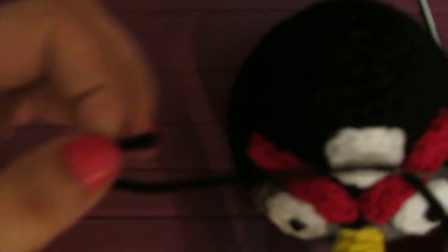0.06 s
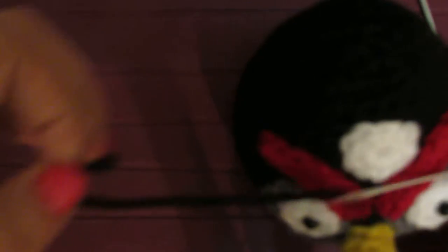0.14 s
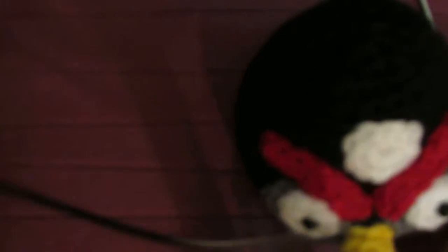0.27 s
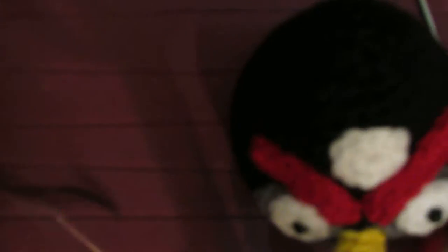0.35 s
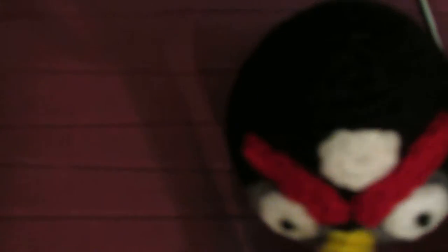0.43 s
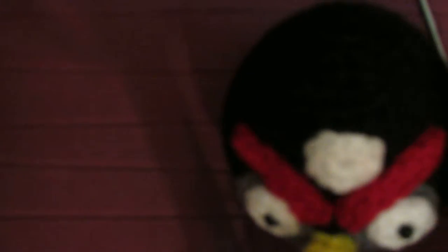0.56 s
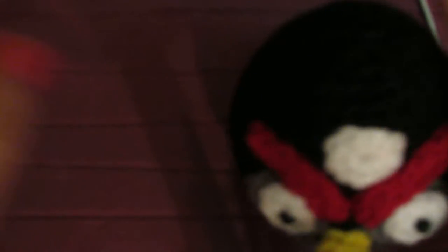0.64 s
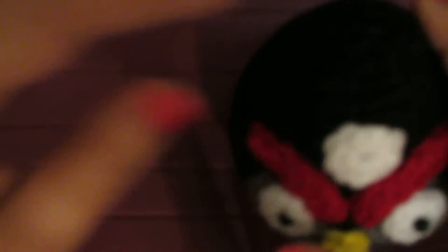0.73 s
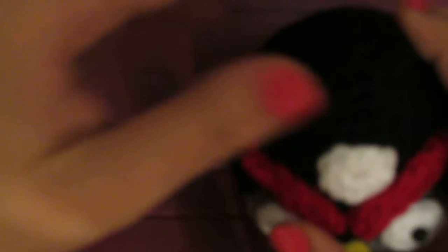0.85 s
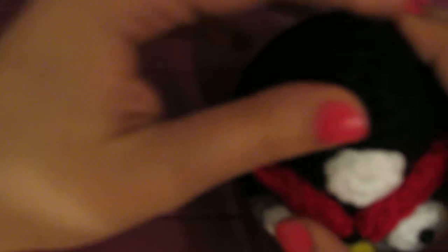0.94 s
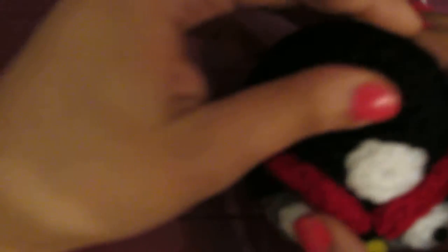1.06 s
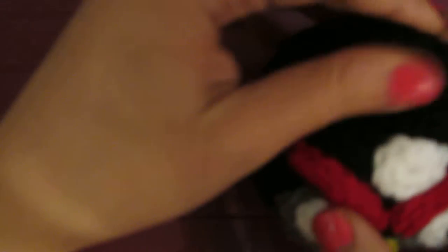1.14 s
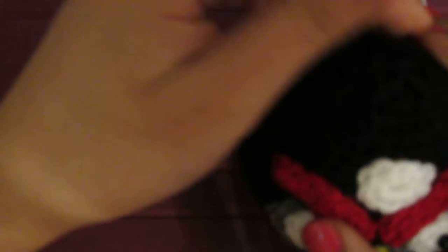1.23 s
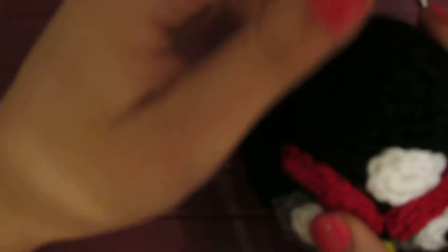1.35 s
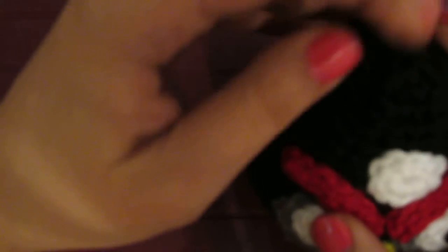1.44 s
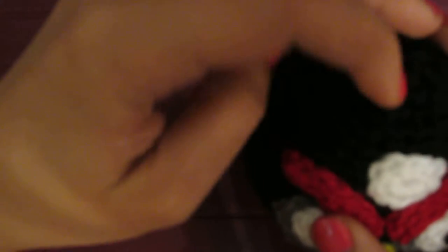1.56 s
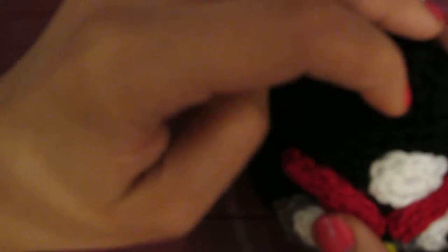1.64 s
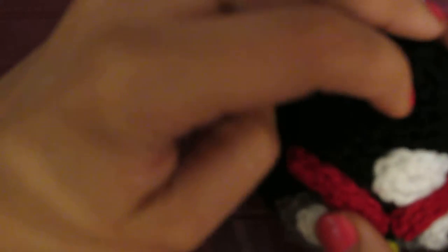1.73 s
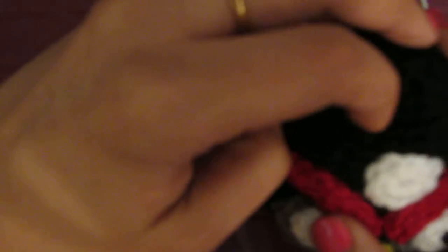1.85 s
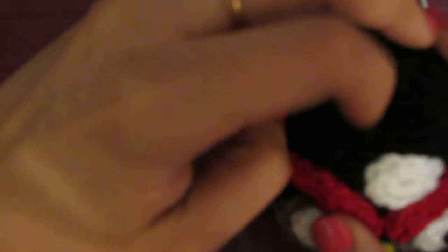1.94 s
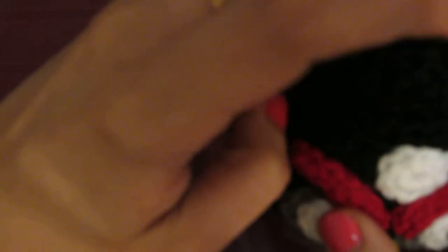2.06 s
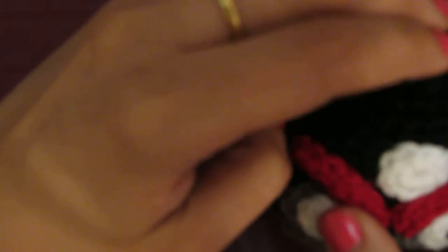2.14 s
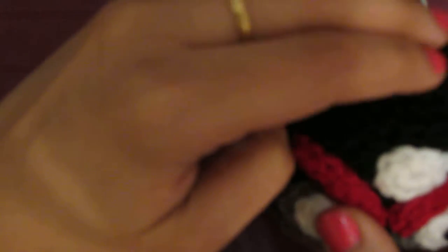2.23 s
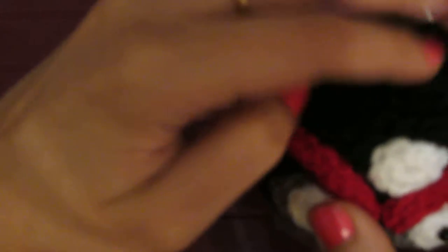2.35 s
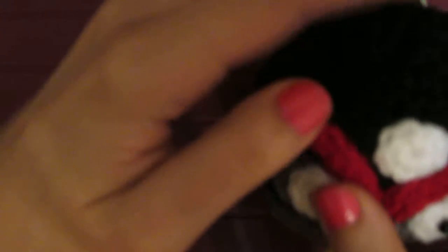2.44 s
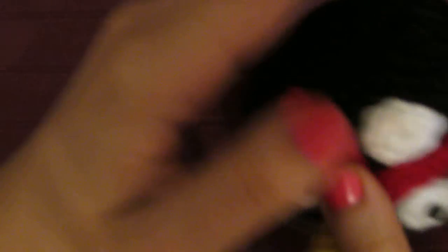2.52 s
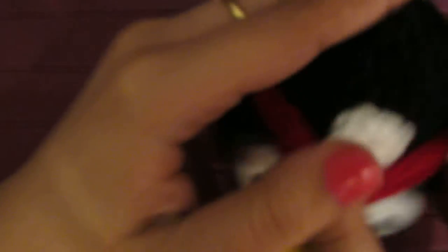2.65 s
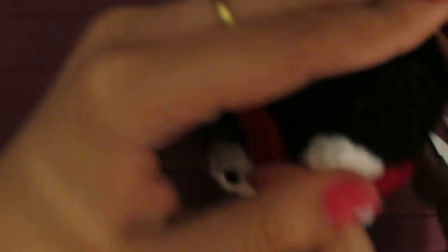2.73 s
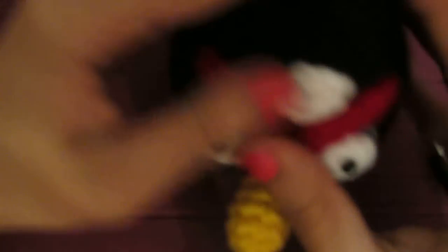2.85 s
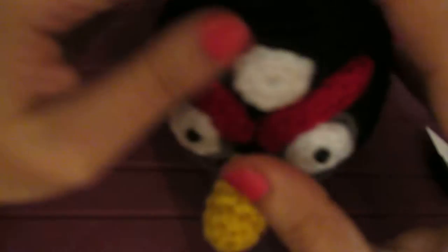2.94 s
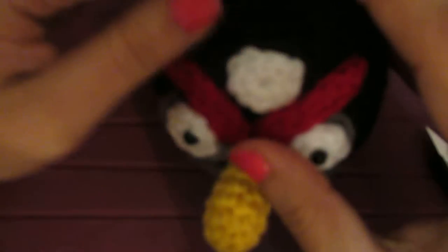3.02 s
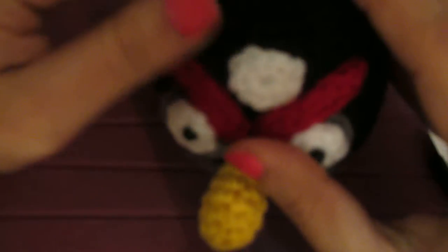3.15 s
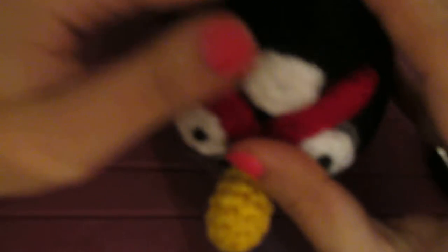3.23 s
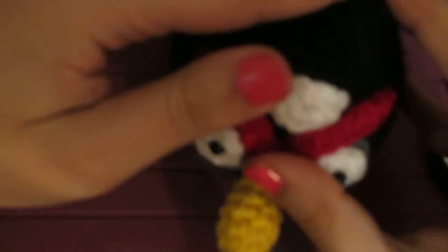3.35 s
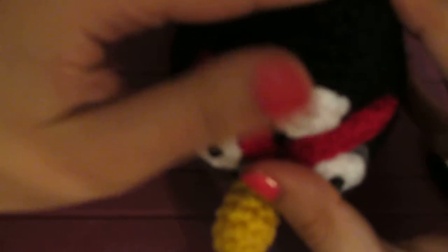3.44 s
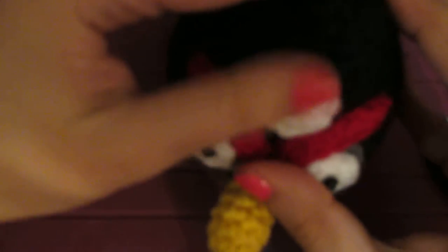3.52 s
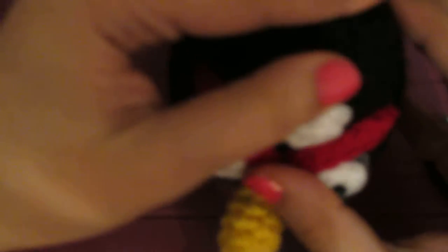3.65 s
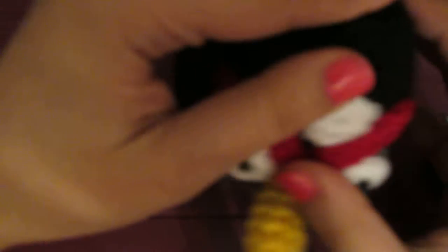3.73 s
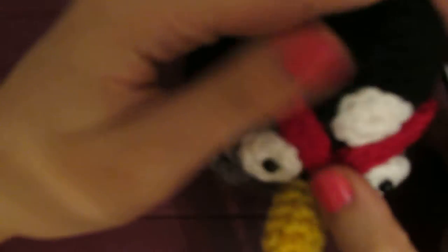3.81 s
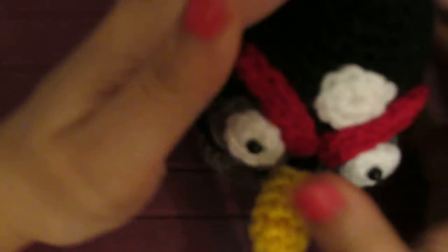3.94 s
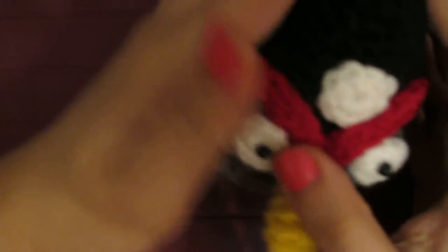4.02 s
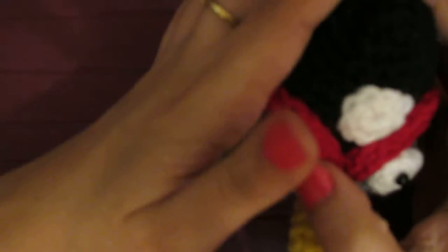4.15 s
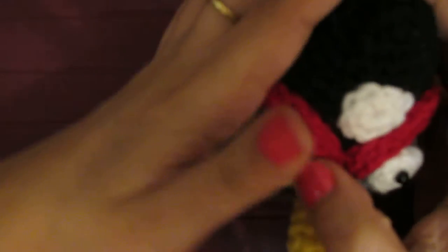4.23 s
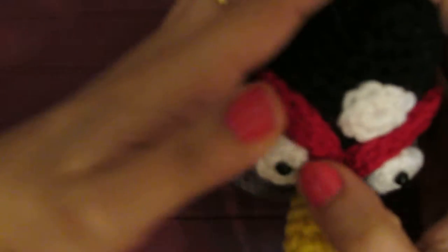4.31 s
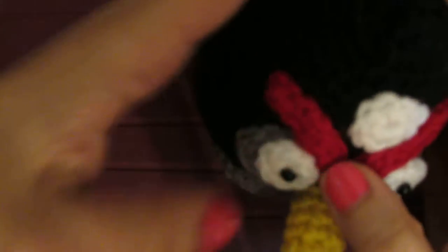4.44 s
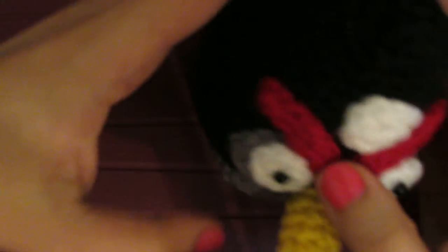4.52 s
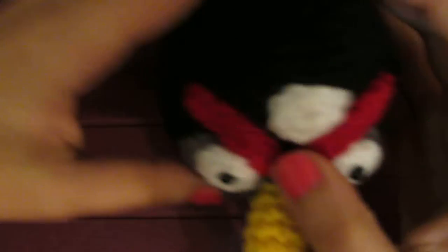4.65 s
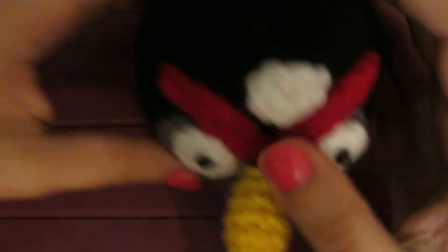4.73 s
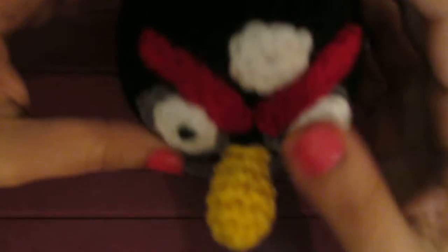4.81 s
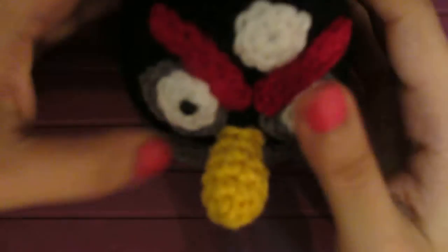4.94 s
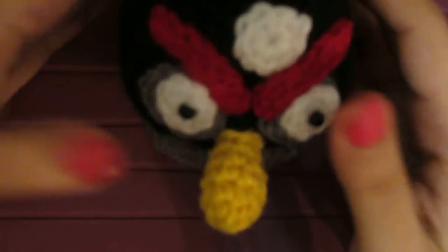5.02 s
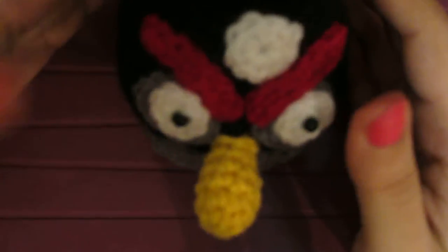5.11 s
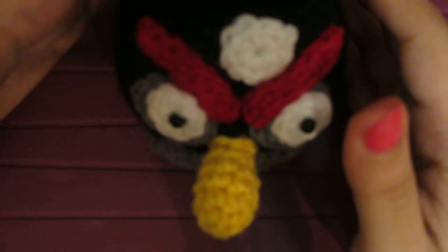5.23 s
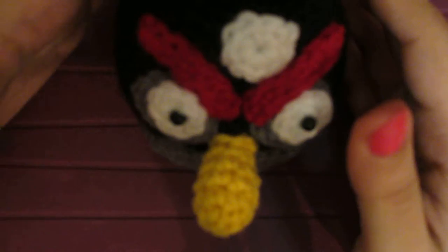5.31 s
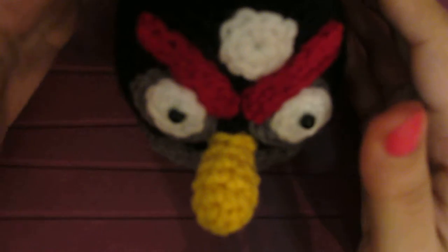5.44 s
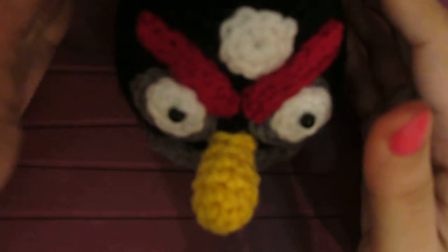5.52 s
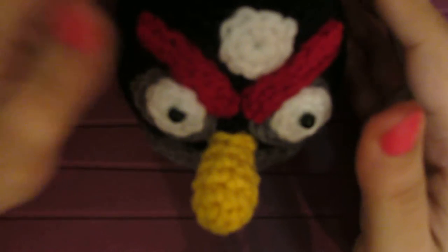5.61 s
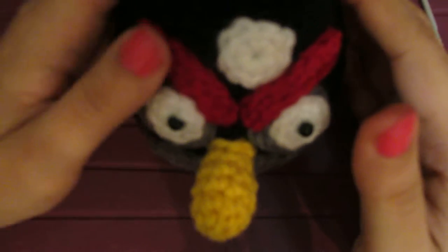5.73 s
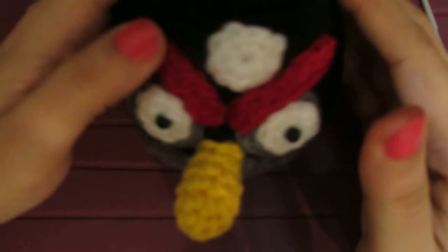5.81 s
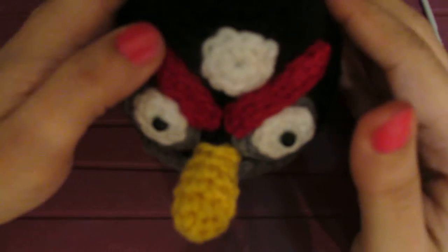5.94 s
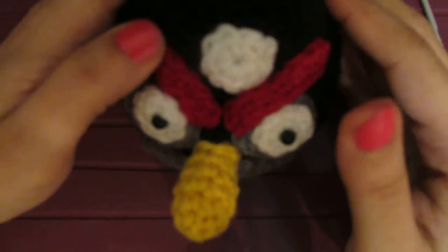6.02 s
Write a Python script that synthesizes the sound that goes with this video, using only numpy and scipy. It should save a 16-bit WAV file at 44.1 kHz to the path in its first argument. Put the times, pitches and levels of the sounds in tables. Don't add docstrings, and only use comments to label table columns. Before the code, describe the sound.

A close stereo microphone in a small indoor room, with scissors and a yarn toy on a wooden table. At about 0.07 s the steel blades give a small bright click. At 0.15 s they hit the table in one hard, dry, clipping knock, by far the loudest sound, with a brief slide and short room tail. At 0.32-0.35 s the blades rattle in a tight cluster of high ringing clicks; faint ticks follow near 0.4-0.47 s. Around 0.52-0.54 s edges scrape and the handle ring drops with a sharp click. The ducked background, airy flow and a low steady motor hum, rises back over the next second or two. Fingers then brush yarn very softly: a quick nail drag at 1.2 s, a small snap at 1.9 s, another at 2.35 s, the strongest rustle around 2.6-2.8 s, then gentle uneven strokes, including one at 4.6 s, until the end at about 6 s.

```python
import sys
import numpy as np
from scipy import signal
from scipy.fft import rfft, irfft, next_fast_len
from scipy.io import wavfile
from scipy.ndimage import map_coordinates

SR = 44100
rng = np.random.default_rng(int(sys.argv[2]) if len(sys.argv) > 2 else 0)


def decibels_to_gain(level_db):
    exponent = np.asarray(level_db, float) / 20
    return 10 ** exponent


def transcribe(signal):
    frames = np.atleast_2d(signal).T
    limited = np.clip(frames, -1, 1)
    pcm = np.round(limited * 32767).astype(np.int16)
    wavfile.write(sys.argv[1], SR, pcm)


N = 267775
SIDES = np.array([[.5], [-.5]])


def along(points, hz):
    f, value = np.transpose(points)
    return np.interp(np.log(hz + 1), np.log(f + 1), value)


def wobble(rate):
    knots = rng.standard_normal(int(N * rate / SR) + 4)
    return map_coordinates(knots, [np.arange(N) * rate / SR])


def filtered(x, response):
    n = x.shape[-1]
    size = next_fast_len(n + 2048)
    spectrum = rfft(x, size) * response(np.fft.rfftfreq(size, 1 / SR))
    return irfft(spectrum, size)[..., :n]


def peak(f, hz, width_hz):
    return 1j * f * width_hz / (hz * hz - f * f + 1j * f * width_hz)


def above(f, hz):
    return (-f * f / (hz * hz - f * f + 1.4j * f * hz)) ** 2


def pair(white, gain, alike):
    def spread(hz):
        likeness = np.clip(along(alike, hz), -.5, 1)
        return np.tan(np.arccos(likeness) / 2)

    mid, side = filtered(white, lambda hz: gain(hz) * [1 + 0 * hz, spread(hz)])
    return np.array([mid + side, mid - side]) / np.std(mid)


# t/s, depth/dB
GAIN_DUCKS = [
    (0, 9),
    (.149, 10),
    (.326, 1.5),
    (.535, -0.1),
]
RECOVER_S, FULL_DB, DUCK_S = 0.67, -0.42, 0.02


def gain_control():
    s, depth_db = np.transpose(GAIN_DUCKS)[..., None]
    since = np.arange(N) / SR - s
    onset = np.clip(since / DUCK_S + (s == 0), 0, 1)
    return FULL_DB - np.sum(depth_db * onset * np.exp(-np.abs(since) / RECOVER_S), 0)


# f/Hz, level/dB per Hz
AIR_SPECTRUM = [(160, -30), (280, -6), (442, -7.5), (580, -6), (722, -10), (800, -6), (1050, -7.5),
                (1280, -13.5), (1470, -13), (1650, -14), (1940, -18), (2200, -17), (2890, -21.5),
                (3660, -23.5), (3900, -27), (7340, -38), (16000, -46)]
# f/Hz, width/Hz, level/dB
ROOM_MODES = [(58.3, 40, -18), (106, 51, -9), (133.7, 12, -7), (176.4, 21, -10), (193.3, 11.6, 1),
              (240.2, 58.4, -7), (319.6, 5, -13), (359.8, 5.3, -12)]
# f/Hz, likeness/1
ROOM_LIKENESS = [(60, 0.48), (180, 0.87), (550, 0.49), (1650, 0.13), (4970, 0.18), (15000, 0.0304)]
# f/Hz, left minus right level/dB
ROOM_LEAN = [(60, 3.5), (180, 0.0), (550, -0.5), (1650, -1.5), (4970, -1), (15000, 0)]
HUM_HZ = 58.4


def room():
    def air_gain(hz):
        return decibels_to_gain(along(AIR_SPECTRUM, hz))

    def mode_gain(f):
        return np.sqrt(sum(np.abs(decibels_to_gain(db) * peak(f, hz, w) ** 2) ** 2 for hz, w, db in ROOM_MODES))

    air = pair(rng.standard_normal((2, N)), air_gain, ROOM_LIKENESS)
    boom = pair(rng.standard_normal((2, N)), mode_gain, ROOM_LIKENESS)
    turns = np.cumsum(HUM_HZ + 0.61 * wobble(2.83)) / SR
    hum = decibels_to_gain(1.2 * wobble(4.4)) * np.sin(2 * np.pi * turns + 0.8 * SIDES)
    swell = decibels_to_gain(0.22 * wobble(1.89) + 0.28 * wobble(9.1))
    mix = decibels_to_gain(-42) * swell * air + decibels_to_gain(-38.5) * boom + decibels_to_gain(-41) * hum
    return filtered(mix, lambda hz: decibels_to_gain(along(ROOM_LEAN, hz) * SIDES))


def contacts(rows, place, modes, body_hz, body_width_hz, low_hz, band_db, click, apart, lean_db, order=2):
    out = np.zeros((2, N + SR))
    t = np.arange(SR // 5) / SR
    hz, level, life = np.transpose(modes)[..., None]

    def colour(f):
        return peak(f, body_hz, body_width_hz) ** order * above(f, low_hz)

    for s, db, t60, ring_db, band_hz in rows:
        lag = np.interp(s, *np.transpose(place))
        late = (lag * SIDES + 1) / SR
        shared, own, drift = rng.standard_normal((3, len(t)))
        size, phase = rng.standard_normal((2, 2, len(modes), 1))
        fade = decibels_to_gain(-60 * t / t60)
        burst = (shared + 2 * SIDES * apart * own) * fade * (1 - np.exp(-t / .0001))
        burst[:, 1] += click * min(0.011 / t60, 1) ** 2
        burst = filtered(burst, lambda f: colour(f) * np.exp(-2j * np.pi * f * late))
        note_phase = 2 * np.pi * band_hz * (t - late) + 0.14 * np.cumsum(drift)
        note = min(.05 / t60, 1) ** 2 * fade * np.sin(note_phase)
        ring_phase = 2 * np.pi * hz * (t - late[..., None]) + 0.93 * phase
        ring = decibels_to_gain(ring_db + level + 1.1 * size - 60 * t / life) * np.sin(ring_phase)
        tones = decibels_to_gain(band_db) * note + ring.sum(1)
        sound = burst / np.abs(burst).max() + tones * (1 - np.exp(-t / 0.00014))
        start = round(s * SR) - 1
        out[:, start:][:, :len(t)] += decibels_to_gain(db + SIDES * (lean_db - 3.1 * lag)) * sound
    return out[:, :N]


# t/s, peak level/dB, burst t60/s, ring level/dB, strongest band f/Hz
BLADE_CONTACTS = [(.0684, -28, 0.013, -44, 5030), (.0686, -16.5, .010, -44, 13200),
                  (.0685, -25, .014, -43, 7700), (.0706, -26, 0.014, -40, 12700),
                  (.0758, -33, 0.027, -36, 7700), (.0687, -31.5, 0.015, -40, 4010),
                  (.0712, -33, .03, -44, 10700), (.0762, -38, .02, -44, 4500),
                  (.0765, -37.5, .02, -44, 13500), (.1484, -15.5, 0.008, -40, 10100),
                  (.3204, -22, 0.01, -28, 7850), (.3212, -27.5, 0.017, -28.5, 2600),
                  (.3230, -27, 0.014, -29, 10400), (.3258, -22, 0.016, -30, 4600),
                  (.3268, -21, .015, -36, 4200), (.3285, -23, .012, -36, 8100),
                  (.3256, -21.5, 0.036, -30, 8060), (.3250, -22.5, 0.038, -36, 6620),
                  (.3285, -25.5, 0.019, -30, 5100), (.3290, -23, 0.011, -11, 11240),
                  (.3322, -24, 0.011, -32, 10340), (.3338, -27, .01, -36, 14200),
                  (.3390, -42, .04, -36, 8100), (.3430, -36, 0.027, -36, 4870),
                  (.3515, -37, 0.026, -25, 4930), (.3545, -39, 0.026, -30, 6650),
                  (.4285, -34, 0.016, -29, 4960)]
# t/s, left lag/samples
BLADES_PLACE = [(.2, 2), (.3, 1), (.36, 1), (.42, 2)]
# f/Hz, level/dB, t60/s
STEEL_MODES = [(2885, -15, .12), (3424, -17, .12), (4878, -10, .1), (4963, -11, .14), (6510, -17, .1),
               (6675, -13, .15), (8048, -5, .17), (8190, -13, .08), (9475, -20, .12), (10340, 3, .1),
               (11300, -2, .13), (12340, 1, .13), (14150, -11, .12), (14750, -18, .12)]


def blades():
    return contacts(BLADE_CONTACTS, BLADES_PLACE, STEEL_MODES, body_hz=9330, body_width_hz=59000,
                    low_hz=2900, band_db=1.5, click=0.98, apart=.45, lean_db=-0.5)


# f/Hz, t60/s
WALL_DECAY = [(300, 0.1), (1500, 0.31), (4000, 0.45), (7000, 0.37), (15000, 0.29)]


def walls(x, delay):
    hz, t, z = signal.stft(rng.standard_normal((2, SR // 2)), SR, nperseg=256)
    decay = decibels_to_gain(-60 * t / along(WALL_DECAY, hz)[:, None])
    tail = signal.istft(z * decay, SR, nperseg=256)[1]
    sent = np.pad(x.mean(0), (round(delay * SR), 0))[None]
    return signal.oaconvolve(sent, tail / np.linalg.norm(tail[0]), axes=1)[:, :N]


def steel_in_walls(steel):
    ticks = np.zeros((1, N))
    for s, db, *_ in BLADE_CONTACTS + HANDLE_CONTACTS + EDGE_SCRAPES:
        ticks[0, round(s * SR)] += decibels_to_gain(db + 1.0)
    sent = steel + filtered(ticks, lambda hz: above(hz, 3500))
    return decibels_to_gain(-13) * walls(sent, delay=0.0031)


# t/s, peak level/dB, burst t60/s, ring level/dB, strongest band f/Hz
TABLE_KNOCKS = [(0.1484, 5.5, .006, -24, 4600), (0.1501, -5.5, .009, -24, 4520),
                (.1515, -16.5, 0.038, -24, 1740), (.1560, -24, .03, -20, 1690),
                (.1632, -20, .025, -22, 2510), (.1665, -26, .03, -21, 1700), (.1745, -25, .03, -20, 3700),
                (.1780, -28.5, 0.22, -30, 3900), (.3270, -23, 0.088, -20, 3290),
                (.3958, -31, .014, -12, 4260), (0.3961, -38, .02, -11, 2900), (.4665, -40, .012, -24, 4000),
                (0.4705, -27.5, .011, -28, 4100), (4.0008, -37, .02, -30, 4960)]
# t/s, left lag/samples
KNOCKS_PLACE = [(.33, 1), (.46, -1), (4, 0)]
# f/Hz, level/dB, t60/s
WOOD_MODES = [(109, -13.5, .028), (400, -10, 0.0198), (489, 4, 0.038), (680, 0, .04), (1000, -1, .03),
              (1400, -4, .025), (1680, -1, .028), (2290, -1, .03), (2700, -6.5, .025), (2990, -2, .025),
              (3400, 1, .02), (3950, 2, .018), (5100, -3, .015)]


def table_knocks():
    return contacts(TABLE_KNOCKS, KNOCKS_PLACE, WOOD_MODES, body_hz=3570, body_width_hz=5800,
                    low_hz=248, band_db=-7, click=14, apart=1.0, lean_db=-0.5, order=4)


# f/Hz, level/dB per Hz
KNOCK_TO_WALLS = [(150, -20), (500, 3.5), (1500, -3), (3500, -6.5), (5000, -14), (7000, -26), (16000, -29)]


def knocks_in_walls():
    blows = np.zeros((1, N))
    for s, db, *_ in TABLE_KNOCKS:
        blows[0, round(s * SR)] = decibels_to_gain(db)
    blows = filtered(blows, lambda hz: decibels_to_gain(along(KNOCK_TO_WALLS, hz)))
    return decibels_to_gain(5.0) * walls(blows, delay=.005)


# t/s, peak level/dB, burst t60/s, ring level/dB, strongest band f/Hz
EDGE_SCRAPES = [
    (.1500, -20, .03, -40, 11800),
    (.1650, -31, .03, -40, 9500),
    (.4300, -28.5, .025, -36, 11900),
    (.4974, -33, .009, -34, 12000),
    (.5310, -20, 0.017, -38, 14800),
    (.5323, -21, .015, -43, 7840),
    (.5345, -29, .015, -40, 11970),
    (.5420, -35, .1, -40, 11000),
]
# t/s, left lag/samples
HANDLE_PLACE = [(.2, 2), (.522, 1.4), (.529, -1.8), (4, 0)]
# f/Hz, level/dB, t60/s
RING_MODES = [(4580, -8, .1), (4683, -0.5, 0.29), (4620, -4, .2), (4974, -9, .15), (5900, -8, 0.057),
              (7450, -8.5, .08), (9146, -6, .12), (11040, -5, .14), (14700, -9, .04)]


def scrapes():
    return contacts(EDGE_SCRAPES, HANDLE_PLACE, RING_MODES, body_hz=11000, body_width_hz=30000,
                    low_hz=2600, band_db=-7, click=1.5, apart=.45, lean_db=1.0)


# t/s, peak level/dB, burst t60/s, ring level/dB, strongest band f/Hz
HANDLE_CONTACTS = [
    (0.518, -28, .016, -33.5, 4700),
    (0.517, -30, .02, -30, 12800),
    (0.521, -34, 0.012, -29, 10500),
    (.5378, -13.5, 0.008, -45, 10800),
    (0.5381, -26, 0.014, -25, 4800),
    (.5383, -29, .01, -45, 6400),
    (.5630, -46, .04, -15, 4600),
    (.5410, -34, .03, -40, 4300),
]


def handle():
    return contacts(HANDLE_CONTACTS, HANDLE_PLACE, RING_MODES, body_hz=10400, body_width_hz=50000,
                    low_hz=2090, band_db=1.2, click=1.6, apart=0.49, lean_db=-1.5)


def scissors():
    steel = blades() + handle() + scrapes()
    return steel + table_knocks() + steel_in_walls(steel) + knocks_in_walls()


# peak t/s, rise/s per 10 dB, fall/s per 10 dB, level/dB, fuzz over strands/dB
FINGER_STROKES = [(.565, .012, 0.047, -61, 5), (1.21, 0.038, 0.0089, -55, 1), (1.83, 0.033, .04, -63, -5),
                  (1.89, 0.0084, .02, -59, -12), (1.97, .08, .03, -64, 0), (2.35, 0.013, 0.17, -59, -6),
                  (2.58, 0.043, 0.021, -53.5, -8), (2.69, 0.068, 0.076, -51, -12),
                  (2.74, 0.026, 0.015, -48, -14), (2.775, .05, .02, -62, 3), (2.84, .03, 0.16, -56.5, -6.5),
                  (2.96, .02, .15, -63, 2), (3.06, .1, 0.22, -56.5, -7), (3.27, 0.045, .15, -62, 0),
                  (3.64, 0.18, 0.19, -61, -6), (3.76, .04, 0.27, -60.5, -1.5), (3.87, .15, 0.069, -63, -12),
                  (4.17, 0.26, 0.017, -57.5, -12), (4.37, 0.084, 0.15, -61.5, -2.5),
                  (4.62, .06, 0.083, -57.5, -10), (4.98, 0.11, 0.047, -57.5, -3),
                  (5.03, .05, .012, -60, -1), (5.83, 0.085, 0.074, -61, -9), (5.99, 0.1, 0.04, -58, -9)]
HOLD_S, SETTLE_S, HOLD_DB, HOLD_FUZZ_DB = 0.86, 0.29, -79, -2.5


def pressure():
    t = np.arange(N) / SR
    rest_db = HOLD_DB - 10 * np.maximum(HOLD_S - t, 0) / SETTLE_S
    coarse = decibels_to_gain(2 * rest_db)
    fine = decibels_to_gain(2 * (rest_db + HOLD_FUZZ_DB))
    for s, rise, fall, db, fuzz_db in FINGER_STROKES:
        power = decibels_to_gain(2 * db - 20 * np.maximum((s - t) / rise, (t - s) / fall))
        coarse = coarse + power
        fine = fine + decibels_to_gain(2 * fuzz_db) * power
    return np.sqrt(coarse), np.sqrt(fine)


# f/Hz, level/dB per Hz
STRAND_SPECTRUM = [(2000, -7.5), (4000, 0.5), (6500, -3), (8500, -4.5), (11000, -20), (16000, -49.5)]
# f/Hz, level/dB per Hz
FUZZ_SPECTRUM = [(5000, -52), (8500, -9.5), (10500, 3), (14500, -0.5), (16000, -0.5)]


def strokes(slips, alike):
    on_strands, on_fuzz = pressure()
    coarse = on_strands * pair(slips, lambda hz: decibels_to_gain(along(STRAND_SPECTRUM, hz)), alike)
    fine = on_fuzz * pair(slips, lambda hz: decibels_to_gain(along(FUZZ_SPECTRUM, hz)), alike)
    return coarse + fine


# peak t/s, rise/s per 10 dB, fall/s per 10 dB, level/dB
NAIL_DRAGS = [
    (1.215, 0.028, .006, -60),
    (2.64, 0.025, .02, -64),
    (2.69, .025, 0.026, -58),
    (4.62, .04, .03, -59),
    (4.68, .015, .01, -64),
]


def nail(slips, alike):
    s, rise, fall, db = np.transpose(NAIL_DRAGS)[..., None]
    t = np.arange(N) / SR
    push = decibels_to_gain(db - 10 * np.maximum((s - t) / rise, (t - s) / fall)).sum(0)
    return push * pair(slips, lambda hz: np.abs(peak(hz, 7060, 4100)) ** 2, alike)


# t/s, peak level/dB, burst t60/s, ring level/dB, strongest band f/Hz
FIBRE_SNAPS = [
    (1.8263, -47, .03, -40, 7400),
    (1.8911, -35, .0072, -40, 9000),
    (2.3561, -40, .02, -40, 9000),
    (2.418, -47, .02, -40, 12000),
    (3.055, -48, .01, -40, 11000),
    (4.165, -52, .015, -40, 7500),
    (4.3006, -48, .01, -40, 4400),
    (4.984, -50, .008, -40, 8000),
    (5.023, -50, .008, -40, 9000),
]
# t/s, left lag/samples
SNAPS_PLACE = [(0, 1)]


def snaps():
    return contacts(FIBRE_SNAPS, SNAPS_PLACE, RING_MODES, body_hz=9000, body_width_hz=12000,
                    low_hz=3500, band_db=-12, click=2.8, apart=0.37, lean_db=-2.0)


def fingers():
    slips = rng.standard_normal((2, N)) * decibels_to_gain(3 * np.minimum(rng.exponential(size=N), 4))
    alike = [(4000, 0.55), (15000, .05)]  # f/Hz, left-right likeness
    touch = decibels_to_gain(1.3 * wobble(40))
    rustle = touch * (strokes(slips, alike) + nail(slips, alike))
    return rustle * decibels_to_gain([[-.7], [.7]]) + snaps()


def scene():
    return scissors() + fingers() + decibels_to_gain(gain_control()) * room()


def band_limit(x):
    return signal.sosfilt(signal.butter(12, 16390, fs=SR, output="sos"), x)


def record(dry):
    clipped = dry / (1 + np.abs(dry / .98) ** 8) ** (1 / 8)
    limited = filtered(clipped, lambda hz: np.clip((15900 - hz) / 250, 0, 1))
    return band_limit(limited)


dry = scene()
out = record(dry)
transcribe(out)
```